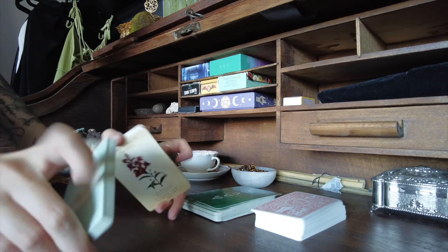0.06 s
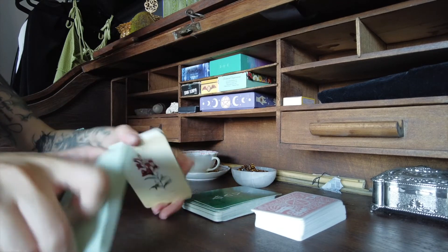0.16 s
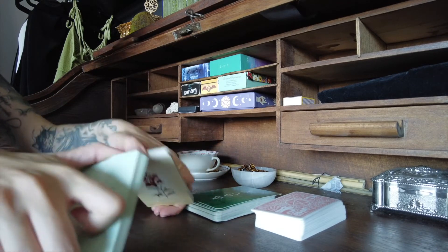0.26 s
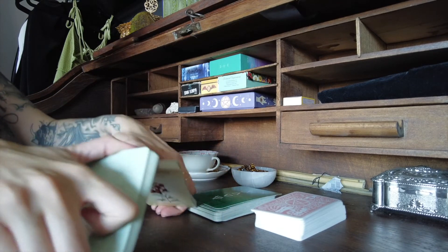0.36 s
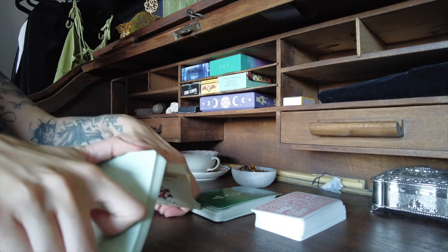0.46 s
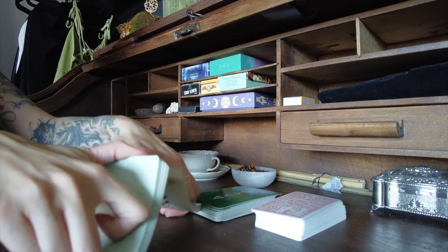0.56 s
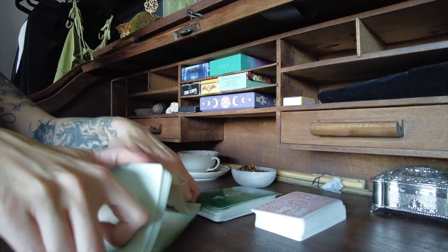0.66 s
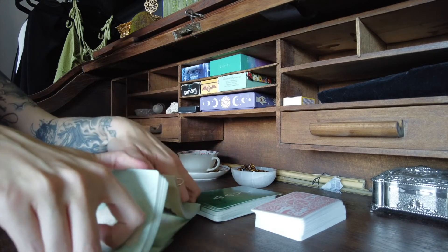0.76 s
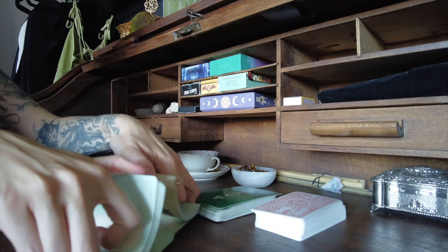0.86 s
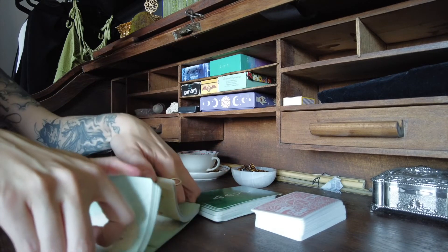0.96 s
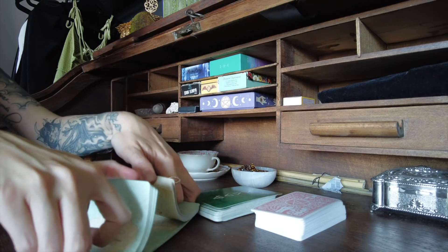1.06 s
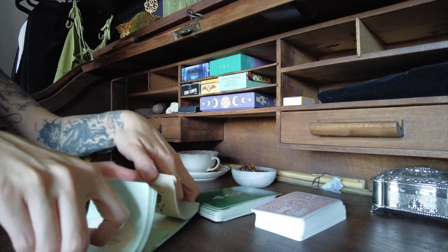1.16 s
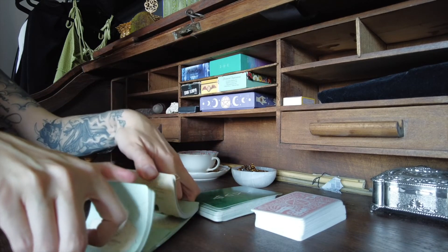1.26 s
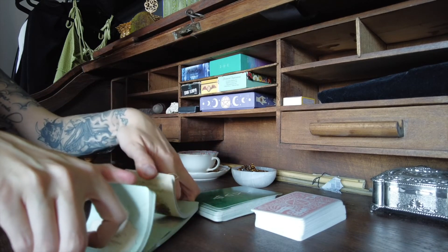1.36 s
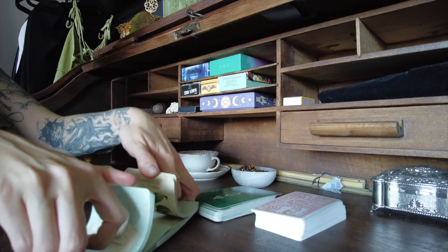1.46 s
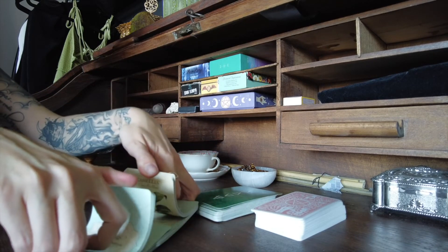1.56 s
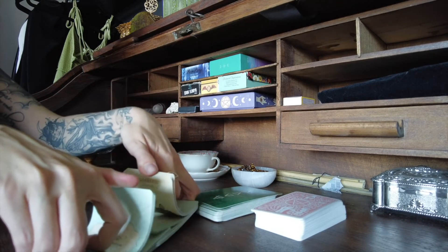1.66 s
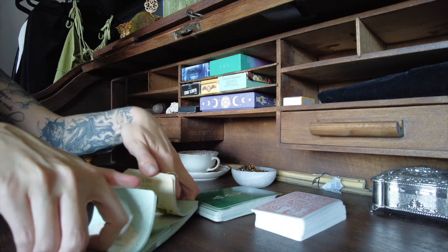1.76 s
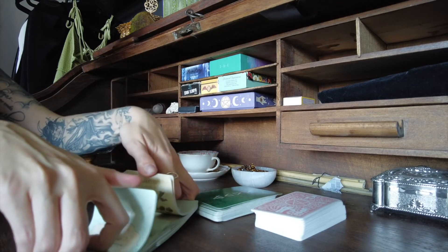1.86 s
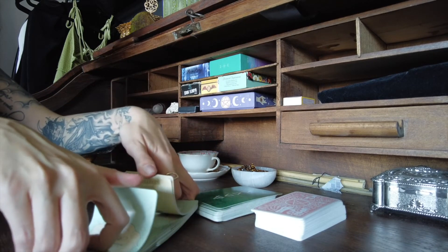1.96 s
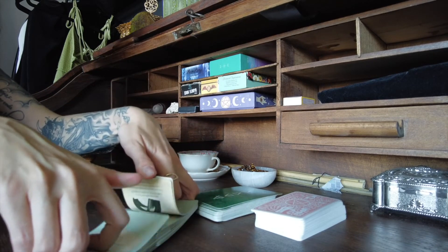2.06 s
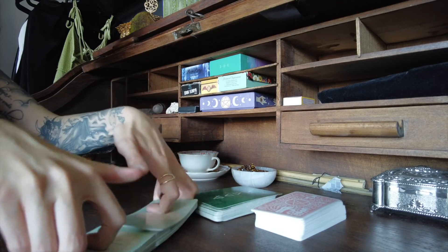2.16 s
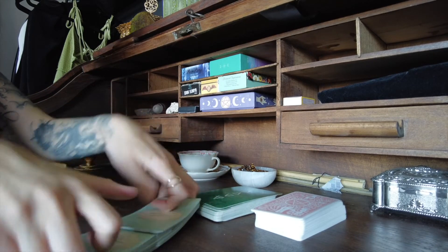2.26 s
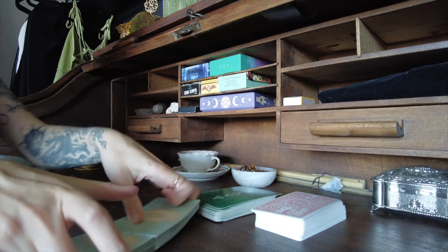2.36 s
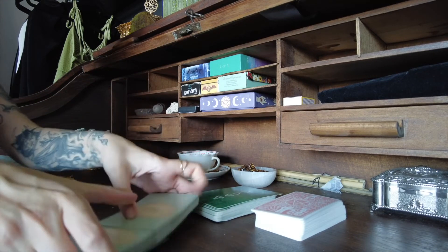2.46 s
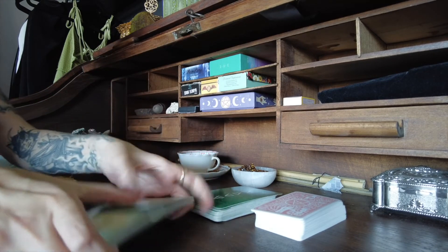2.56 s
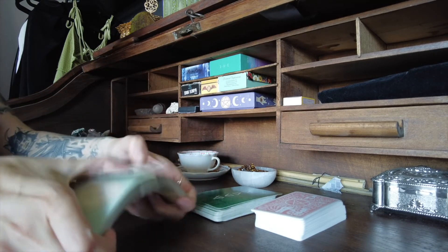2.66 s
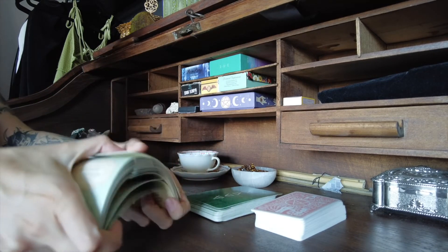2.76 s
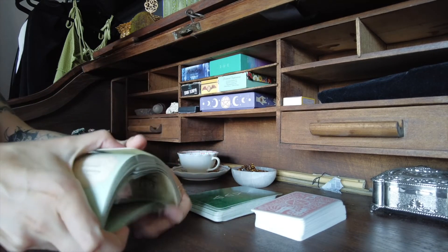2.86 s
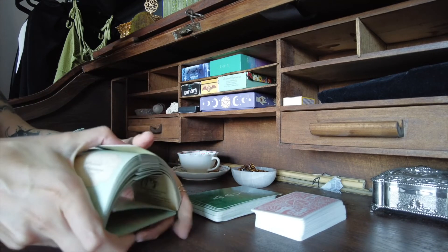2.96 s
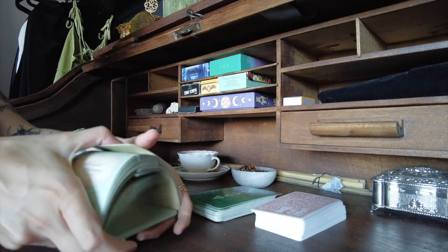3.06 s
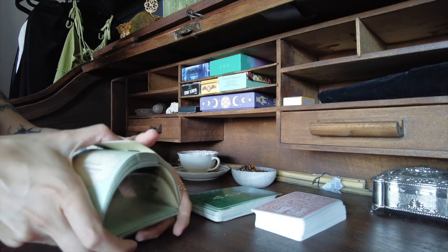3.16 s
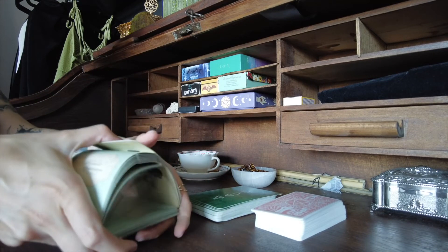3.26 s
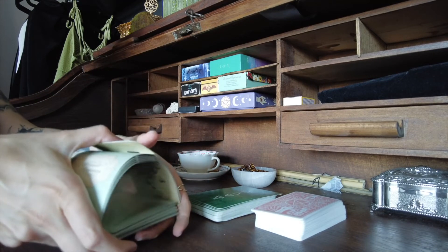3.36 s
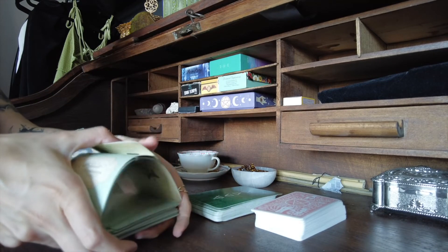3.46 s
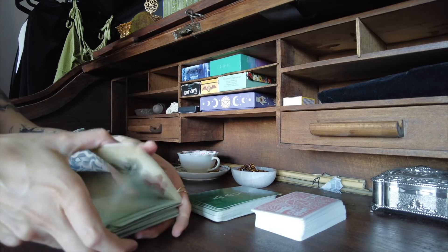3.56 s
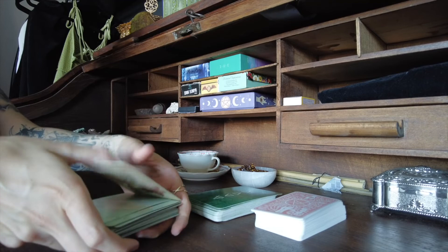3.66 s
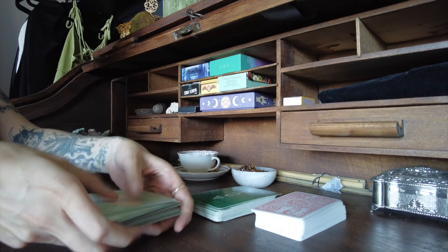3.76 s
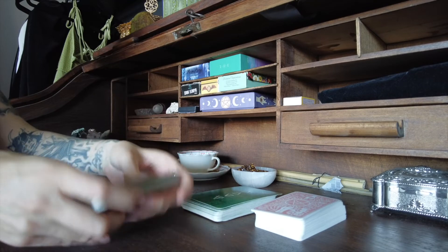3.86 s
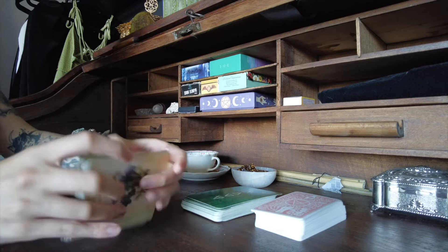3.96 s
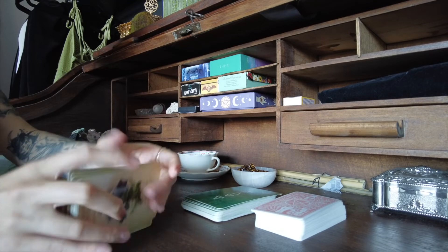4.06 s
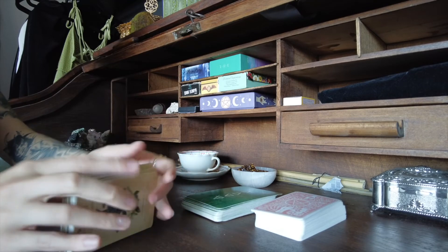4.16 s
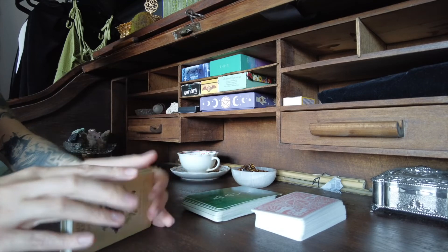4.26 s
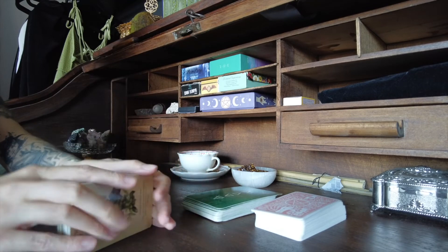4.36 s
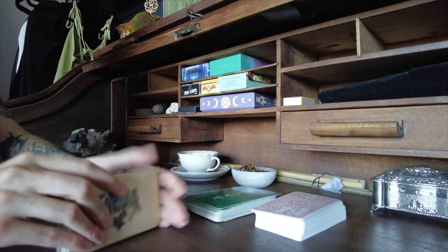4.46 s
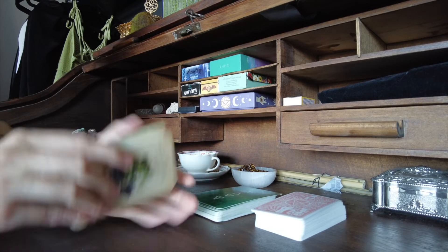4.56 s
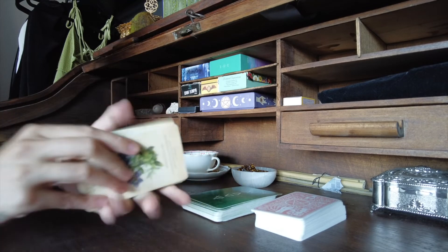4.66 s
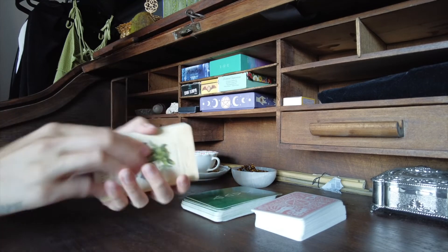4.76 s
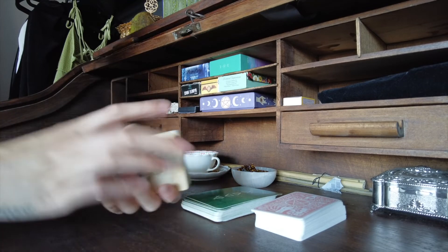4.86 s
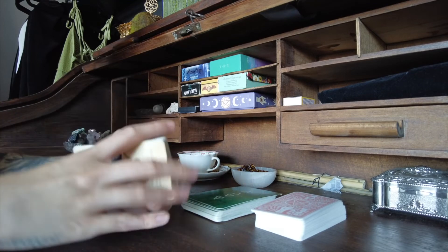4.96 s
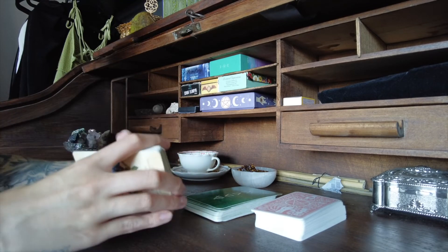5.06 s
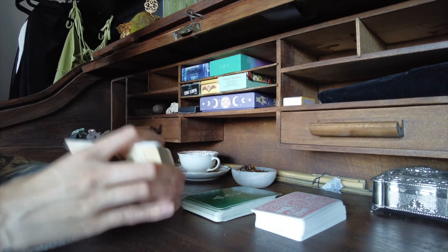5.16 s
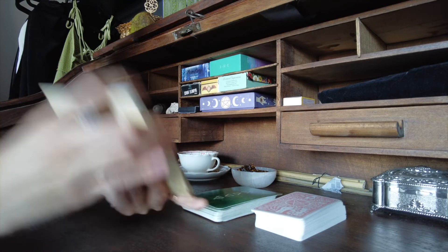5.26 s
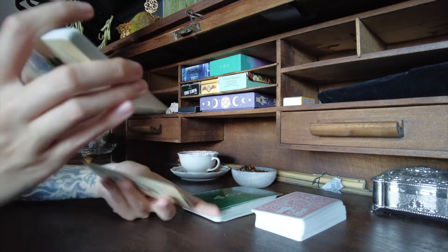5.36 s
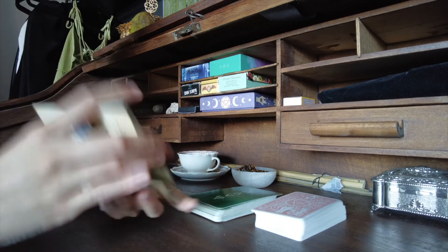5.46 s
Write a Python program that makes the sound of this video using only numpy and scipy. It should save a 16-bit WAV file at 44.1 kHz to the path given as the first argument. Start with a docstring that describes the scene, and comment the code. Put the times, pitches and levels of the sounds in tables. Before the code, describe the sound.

Two spaced microphones sit close to hands working a deck of cards on a wooden desk, in a dry room with only a very short woody reflection. From 0 to 0.6 s there are faint snaps and soft hand rubbing. At about 0.65 s a clear snap starts the riffle: irregular crisp clicks from 0.8 s, crowding together around 1.2-1.45 s, and turning brighter and scratchier until about 2.13 s, with dull low desk thumps beneath. From 2.2 to 3.0 s it quietens to papery slides and soft knocks. Between 3.05 and 3.6 s the arched deck cascades shut in a rapid swishing flutter of snaps. From 3.8 to 4.45 s the deck is squared with muted, hollow, blocky taps and brief scrapes. Sparse rubs follow, then a snap with a firm desk thump near 5.3 s and small clicks at 5.5 s. A low rumble follows the hands over faint steady noise.

```python
"""At a wooden desk with shelves, two spaced microphones stand close to hands working a deck of cards.
First come a few faint snaps, then the riffle: card edges crack, ring and slap while the desk thumps low.
The cards rub and slide in the hands, the arched deck cascades shut, and it is squared up on the desk top.
Snaps and rubs are shaped noise; the card hollow, desk and drawer are resonators; the shelves answer
with a short noise tail. A low rumble follows the hands, over steady background noise."""
import sys
import numpy as np
from scipy import signal
from scipy.fft import rfft, irfft, next_fast_len
from scipy.io import wavfile
from scipy.ndimage import uniform_filter1d, map_coordinates

SR = 44100
rng = np.random.default_rng(int(sys.argv[2]) if len(sys.argv) > 2 else 0)


def gain_from_db(level_db):
    """Turn a decibel level (scalar or array-like) into a linear amplitude factor."""
    decades = np.asarray(level_db, float) / 20
    return 10 ** decades


def dump(signal):
    """Clip the signal to [-1, 1] and save it as 16-bit WAV at the path in sys.argv[1]."""
    limited = np.clip(np.atleast_2d(signal).T, -1, 1)
    pcm = np.round(limited * 32767).astype(np.int16)
    wavfile.write(sys.argv[1], SR, pcm)


N = 243431  # samples

# Levels in all tables are relative: later gains set how loud each layer sits.
# card edges slipping and slapping: start_s, peak_db, push_db and treble_db (over the peak), ring_hz
CARD_SNAPS = [(.079, -44, 0.5, -28.5, 1865), (0.1711, -39.5, 0, -22, 1630), (0.625, -29.5, -11, -13, 3140),
              (0.6564, -6.5, -11.5, -9.5, 1423), (.7321, -21, -16.5, -18.5, 2140),
              (0.7864, -32, -35, -15.5, 1540), (.834, -4.5, -15.5, -11, 1392),
              (0.8579, -15.5, -5, -13.5, 2190), (0.8922, -20.5, -10, -17, 2070),
              (0.9123, -10, -23.5, -19, 1770), (.926, -7, -4.5, -17.5, 2100), (0.9478, -4, -8, -19.5, 1600),
              (0.957, -6, -10, -24.5, 1550), (1.0116, -27.5, -6, -12, 1830),
              (1.0224, -2.5, -11.5, -15.5, 1697), (1.066, -26.5, -4.5, -7, 1670),
              (1.078, -6, -3.5, -18.5, 1310), (1.0966, -11, -14.5, -18, 1700),
              (1.1363, -22, -9.5, -7.5, 1540), (1.1627, 0.5, -12.5, -20, 2300),
              (1.2043, -24, -2.5, -8.5, 1810), (1.213, -7, -9.5, -21.5, 1717),
              (1.2378, -5, -18.5, -11.5, 1814), (1.2583, -2, -6.5, -18, 1590),
              (1.3047, -6.5, -16.5, -14, 1726), (1.3183, -20, 1, -23, 1730),
              (1.3575, 4.5, -12.5, -21, 1610), (1.3989, -4.5, -19.5, -7, 1610),
              (1.4087, 0, -8, -15.5, 1505), (1.4269, 3.5, -18.5, -8.5, 1500), (1.4442, -1, -9, -17, 1490),
              (1.5285, -26, -15, -7.5, 1325), (1.539, -9, -4.5, -26.5, 1440),
              (1.6145, -22, -15.5, -8.5, 1790), (1.6215, -4, -8.5, -3.5, 1437),
              (1.6903, -2.5, -12, -17, 1855), (1.722, -2.5, -23, -8, 3300), (1.766, -1, -21, -6.5, 3120),
              (1.8437, -4, -8.5, -12, 1737), (1.8788, -2.5, -33, -9, 3250),
              (1.9016, -8.5, -9.5, -21.5, 3820), (1.914, 1, -16, -13, 1454),
              (1.972, -16.5, -15.5, -4, 3200), (1.9794, -5, -7.5, -8.5, 3220),
              (2.0095, 3, -19.5, -14, 1677), (2.0298, 1, -19.5, -15, 3390), (2.0495, 5, -29, -13.5, 3070),
              (2.1157, -0.5, -12, -5.5, 3160), (2.1251, -4.5, -4, -9.5, 2520),
              (2.473, -35.5, -15, -22, 1380), (2.701, -32.5, 0.5, -25, 1520), (3.098, -19, -3, -29, 1255),
              (3.1332, -12.5, -15.5, -6, 1680), (3.153, -10.5, -9.5, -17, 1614),
              (3.1954, -11.5, -14.5, -15, 1840), (3.207, -14, -19.5, -11, 1690),
              (3.29, -8.5, -18.5, -16, 1676), (3.3012, -10, -10.5, -16.5, 1855),
              (3.306, -15, -16, -14, 2500), (3.3186, -5.5, -26.5, -18, 1900),
              (3.3408, 2.5, -15.5, -9, 1690), (3.349, -16.5, -23, -21.5, 1580),
              (3.3641, -24.5, -19.5, -19.5, 1650), (3.387, 2, -22, -13.5, 3160),
              (3.4241, 1, -19, -26, 1396), (3.462, 1.5, -27.5, -14.5, 1425),
              (3.498, -0.5, -25, -18.5, 1545), (3.5343, -4.5, -36, -25, 1470), (3.576, -19, -2, -24, 1290),
              (3.9646, -34, -14.5, -11.5, 1490), (3.995, -15.5, -15, -41, 1405),
              (4.006, -19, -12, -36, 1290), (4.0244, -22.5, -5, -43.5, 1680),
              (4.049, -6.5, -21, -27.5, 2010), (4.057, -9.5, -19, -35.5, 1767),
              (4.123, -13.5, -19, -44, 1670), (4.1882, -10.5, -20, -41.5, 1500),
              (4.3199, -27, -12.5, -40.5, 1660), (4.4071, -20.5, -14, -15.5, 1430),
              (4.415, -23.5, -7.5, -23.5, 1695), (4.429, -29.5, -5.5, -20, 3140),
              (4.695, -29.5, -31, -15.5, 1296), (5.0553, -18.5, -24, -18.5, 1560),
              (5.28, -41.5, 6, -9.5, 1270), (5.3151, -14, 1, -11, 1556), (5.469, -35.5, -8, -9.5, 1600),
              (5.502, -21, -38, -34, 1563), (5.5144, -24.5, -8.5, -21.5, 1740)]
# noise colours of a snap's bright crack, its slap and its push of air and wood: freq_hz, density_db
CRACK_COLOUR = [(1500, -28.5), (3500, -1.5), (6000, 1.5), (10000, -3.5), (16000, -7.5), (20000, -8)]
SLAP_COLOUR = [(300, -11.5), (700, -7), (1400, 3), (2500, -2), (4000, -7), (7000, -22), (20000, -58)]
PUSH_COLOUR = [(80, -1.5), (200, -1.5), (500, -5.5), (900, -8.5), (2000, -24), (20000, -84.5)]
# a puff of air, one broad and dead resonance: centre_hz, width_hz, level_db
AIR_PUFF = [(207, 1100, -5)]
# steady rubbing while the deck is held: time_s, card_on_card_db, hands_on_wood_db
GRIP_RUB = [(0, -67.5, -50), (.45, -67.5, -47.5), (.6, -69.5, -59), (.91, -43.5, -34), (1.05, -56, -44.5),
            (1.15, -42.5, -33), (1.28, -46.5, -56), (1.44, -42, -30), (1.58, -56, -45), (1.68, -37.5, -31),
            (1.8, -33.5, -35), (1.97, -37, -40.5), (2.08, -26.5, -35), (2.17, -40.5, -40), (2.28, -56, -36),
            (2.38, -60, -46.5), (3.0, -50.5, -50.5), (3.66, -58, -54), (3.94, -72.5, -80.5),
            (4.1, -63.5, -42.5), (4.52, -72, -56), (4.85, -64.5, -59.5), (5.1, -67, -47),
            (5.22, -56.5, -64), (5.44, -64, -52.5)]
# single slides: start_s, hold_s, card_faces_db, deck_edge_db, hands_on_wood_db
SINGLE_SLIDES = [(2.231, 0.0044, -43, -45, -38), (2.287, 0.024, -57.5, -48.5, -32.5),
                 (2.464, 0.031, -50, -43, -51), (2.696, .04, -39, -53, -37),
                 (2.747, .022, -34.5, -42.5, -35), (2.836, 0.033, -29.5, -40.5, -43),
                 (2.988, .01, -46, -44, -36.5), (3.06, 0.093, -27.5, -43.5, -38),
                 (3.124, 0.16, -25.5, -31.5, -42.5), (3.305, 0.11, -26, -34.5, -35.5),
                 (3.405, 0.16, -24.5, -30.5, -35), (3.693, 0.027, -59, -53, -53.5),
                 (3.903, 0.017, -54, -59.5, -78), (3.993, 0.036, -62, -39, -54),
                 (4.059, 0.0074, -57, -28.5, -30.5), (4.194, 0.0041, -58, -33.5, -31.5),
                 (4.29, 0.055, -64.5, -50.5, -37.5), (4.41, 0.0081, -47.5, -37, -31),
                 (4.669, .07, -57, -63, -61), (5.28, .02, -44, -58, -44.5),
                 (5.319, 0.0025, -39, -36.5, -45), (5.515, .01, -42.5, -37.5, -47)]
# how fast a slide swells and fades, for faces, edge, wood: rate_db_per_s
SWELL_RATES = [701.5, 899.5, 603]
FADE_RATES = [379.5, 271.5, 219.5]
# noise colours of rubbed card faces, the brighter hiss of slides, and hands on wood: freq_hz, density_db
FACE_COLOUR = [(1200, -10.5), (3000, 2.5), (4200, 3), (7000, 3), (12000, -2.5), (16000, -6), (20000, -16.5)]
SHEEN_COLOUR = [(5000, -30), (9000, 2), (13000, -1), (16000, -5.5), (20000, -11)]
WOOD_COLOUR = [(60, -21), (116, 2), (150, 0.5), (200, -0.5), (320, -0.5), (500, -11), (900, -14.5),
               (20000, -88.5)]
# deck shape from riffle over arch to squared block: time_s, block_db, low_arch_db, high_arch_db
DECK_SHAPE = [(1.5, -33, -18, -28.5), (1.7, -6, -23, 4.5), (2.1, -2, -29.5, 0), (2.4, -18, -17, -24),
              (3.1, -4.5, 1, -19.5), (3.58, -1, 2, -4), (3.72, 3, -11, -9.5), (3.9, 22.5, -2.5, -7.5),
              (4.5, 1.5, -20, -11), (5.3, 2, -14.5, -11)]
# resonances of the squared block and of the arched hollow: centre_hz, width_hz, level_db
BLOCK_MODES = [(640, 270, -6), (785, 59, 3), (930, 26, -6)]
LOW_ARCH_MODES = [(1630, 268, 1.5), (2300, 300, -10.5), (930, 52, -1.5)]
HIGH_ARCH_MODES = [(3020, 500, -0.5), (4500, 330, -32), (6050, 240, -6)]
# hands and deck knocking the desk: start_s, peak_db, boom_db and drawer_db (over the peak)
DESK_KNOCKS = [(0.426, -15, -19.5, -31), (0.645, -24, -16, 2), (0.827, -33, 6, -19), (0.857, -16, 0, -22),
               (0.932, -26, -17, -15), (0.947, -1.5, -14, -27), (1.02, -10, -5.5, -18.5),
               (1.058, -15, -13, -21), (1.154, -12, -21.5, -20), (1.211, 7.5, -15, -20.5),
               (1.26, -27, -14, -14), (1.311, -3, -19.5, -10), (1.358, -30, -4.5, -8.5),
               (1.414, -24, -14, -14.5), (1.441, -13, -2.5, -14), (1.521, -14, -8, -24.5),
               (1.608, -16.5, -32, -20), (1.69, 2, -13, -13), (1.758, -35, -19, -10),
               (1.828, -24, -16.5, -20), (1.909, -3, -6, -12.5), (1.977, -19.5, -20, -21),
               (2.051, 5, -10, -13), (2.107, 1.5, -37, -11), (2.122, -2.5, -19, -10), (2.147, 1, -19, -9),
               (2.328, -13.5, -0.5, -3), (2.579, -11.5, -11.5, -12), (2.7, -23, -1, -20),
               (2.766, -11.5, -3, -15), (2.883, -15.5, 1.5, -3), (3.103, -30, -8.5, -13.5),
               (3.318, -12.5, -8, -0.5), (3.458, -19, -18, -17), (3.581, -20, -32, -0.5),
               (3.797, -16, -13, -15), (3.998, -17, -9, -6), (4.05, -14, -26.5, -16), (4.18, -33, -21, -26),
               (4.405, -21, -21, -21), (5.094, -17.5, -13, -9), (5.316, -24, -4, -14),
               (5.338, 1.5, -7.5, -9)]
# desk top, whole desk rocking, and a hollow drawer that hums on: centre_hz, width_hz, level_db
DESK_TOP_MODES = [(210, 5.7, -1), (248.5, 19, 0.5), (360, 38, 2), (410, 35, -3)]
DESK_ROCK_MODES = [(50, 10, 1.5), (84, 72, 5.5)]
DRAWER_MODES = [(116, 9, 0)]
# decay of the shelves' answer: freq_hz, t60_s
SHELF_DECAY = [(200, 0.15), (2000, 0.22), (10000, 0.18)]
# noise colours of the desk's rumble and of the steady background: freq_hz, density_db
RUMBLE_COLOUR = [(15, -13.5), (30, -11.5), (50, -3.5), (90, -8), (150, -24.5), (20000, -120)]
HUSH_COLOUR = [(15, -26), (25, 16), (123, -17.5), (190, -13.5), (285, -12.5), (560, -18.5), (775, -37),
               (962, -25.5), (1040, -38.5), (1440, -30.5), (2550, -33), (14800, -48), (16000, -56.5)]
# where the paths to the microphones cancel: freq_hz, gain_db
PATH_CANCEL = [(700, -0.5), (1020, -6), (1300, -1), (2000, 0), (2350, -1.5), (2900, -1.5)]
# stereo width: freq_hz, side_minus_mid_db
STEREO_WIDTH = [(60, -16), (92, -24), (140, -11.5), (210, -14.5), (330, -10.5), (500, -8), (770, 0),
                (1170, -0.5), (1790, -13), (2740, 1.5), (4190, 0), (6410, -0.5), (9810, -0.5), (15000, 2)]
# stereo balance: freq_hz, left_minus_right_db
STEREO_LEAN = [(60, -1.5), (180, -1.5), (550, 0), (1650, -0.5), (4970, -0.5), (15000, 0)]


def snaps():
    """A slipping edge cracks bright and short; the card rings at its own pitch, slaps down and shoves air and wood."""
    start_s, peak_db, push_db, treble_db, ring_hz = np.transpose(CARD_SNAPS)
    # each part scales this decay; harder snaps are damped sooner
    t60_s = 0.029 * 2 ** (-0.0371 * peak_db)
    crack = bursts(start_s, peak_db + treble_db + 6, 0.57 * t60_s, rise_s=0.00025) * noise(CRACK_COLOUR)
    slap = bursts(start_s, peak_db - 11, 1.006 * t60_s, rise_s=0.00037) * noise(SLAP_COLOUR)
    ring = bursts(start_s, peak_db - 11.5, 1.06 * t60_s, rise_s=0.0006, ring_hz=ring_hz)
    ring = ring * [[1], [0.7]]
    push = bursts(start_s, peak_db + push_db + 3.5, 0.85 * t60_s, rise_s=0.0013)
    # squeezed air always pushes outward first, so the puff keeps its sign
    puff = gain_from_db(3.5) * ringing(push, AIR_PUFF) * [[1], [0]]
    rattle = lumps(1200, depth_db=3.5) * crack
    rattle = rattle + lumps(800, depth_db=1.5) * (slap + ring)
    return rattle + push * noise(PUSH_COLOUR) + puff


def bursts(start_s, level_db, t60_s, rise_s, ring_hz=None):
    """A faint swell rises and falls around each blow, which climbs and dies away; given ring_hz, a ringing tone."""
    lead = SR // 50
    out = np.zeros(N + SR)
    t = (np.arange(SR // 4) - lead) / SR
    after = np.maximum(t, 0)
    swell = gain_from_db(-26 - 60 * np.abs(t) / 0.059)
    for k, (s, db, life_s) in enumerate(zip(start_s, level_db, t60_s)):
        decay = gain_from_db(-60 * after / max(life_s, 0.004))
        blow = decay * (1 - np.exp(-after / rise_s)) + swell
        tone = 1 if ring_hz is None else np.sin(2 * np.pi * ring_hz[k] * after)
        out[round(s * SR):][:len(t)] += gain_from_db(db) * blow * tone
    return out[lead:][:N]


def slides():
    """Friction comes in tiny catches, so each rub is grainy; smooth faces catch least."""
    card_db, hand_db = curves(GRIP_RUB)
    edge_db = -40.5 + 0.9 * (card_db + 42)
    steady = gain_from_db([card_db, edge_db, hand_db])
    sliding = strokes()
    face, edge, wood = np.maximum(steady, sliding)
    wood = wood * lumps(30, depth_db=3) * noise(WOOD_COLOUR)
    catches = lumps(400, depth_db=1.0)
    edge = edge * ticks(90, spread_db=2.0, t60_s=0.017) * noise(SLAP_COLOUR)
    face = face * lumps(50, depth_db=2.0) * noise(FACE_COLOUR)
    sheen = gain_from_db(-4.5) * sliding[0] * noise(SHEEN_COLOUR)
    return wood + catches * (edge + face + sheen)


def strokes():
    """Gain of faces, edge and wood: each slide swells, holds and fades."""
    t = np.arange(N) / SR
    gain = np.zeros((3, N))
    for start_s, hold_s, *level_db in SINGLE_SLIDES:
        before_db = np.outer(SWELL_RATES, np.maximum(start_s - t, 0))
        after_db = np.outer(FADE_RATES, np.maximum(t - start_s - abs(hold_s), 0))
        gain = np.maximum(gain, gain_from_db(np.c_[level_db] - (before_db + after_db)))
    return gain


def ticks(rate_hz, spread_db, t60_s):
    """A gain of rms 1 that jumps at random moments, as single card edges catch and let go."""
    jolts = (rng.random(N) < rate_hz / SR) * gain_from_db(spread_db * rng.exponential(size=N))
    decay = gain_from_db(-60 * np.arange(SR // 20) / SR / t60_s)
    gain = 0.6 + signal.fftconvolve(jolts, decay)[:N]
    return gain / np.sqrt(np.mean(gain ** 2))


def pocket(cards):
    """The hollow under arched cards rings high; the squared deck knocks lower, like a block."""
    hollows = zip(curves(DECK_SHAPE), (BLOCK_MODES, LOW_ARCH_MODES, HIGH_ARCH_MODES))
    return cards + sum(ringing(gain_from_db(db) * cards, modes) for db, modes in hollows)


def knocks():
    """Soft blows: a smooth push of a few ms into the desk's modes, nearly alike at both microphones."""
    start_s, peak_db, boom_db, drawer_db = np.transpose(DESK_KNOCKS)
    # added dB: how strongly each narrow resonator answers a blow
    answer_db = peak_db + [0 * start_s + 32.5, boom_db + 36.5, drawer_db + 52]
    blows = np.zeros((3, N))
    blows[:, np.round(start_s * SR).astype(int)] = gain_from_db(answer_db)
    t = np.arange(SR // 50) / SR
    soft = t * np.exp(-t / 0.00069)
    blows = signal.fftconvolve(blows, soft[None] / soft.sum(), axes=1)[:, :N]
    parts = zip(blows, (DESK_TOP_MODES, DESK_ROCK_MODES, DRAWER_MODES))
    desk = sum(ringing(blow, modes) for blow, modes in parts)
    return desk * gain_from_db([[0], [-16]])  # mid, side


def shelves(cards):
    """The wooden cubbies answer at once; each frequency dies at its own speed."""
    hz, t, z = signal.stft(rng.standard_normal((2, SR // 3)), SR, nperseg=256)
    decay = gain_from_db(-60 * t / along(SHELF_DECAY, hz)[:, None])
    tail = signal.istft(z * decay, SR, nperseg=256)[1]
    return signal.fftconvolve(cards, tail / np.linalg.norm(tail[0]), axes=1)[:, :N]


def desk_rumble():
    """The desk rumbles as the hands work on it, following their rub sluggishly above a constant floor."""
    hand_db = curves(GRIP_RUB)[1]
    work_db = uniform_filter1d(hand_db, int(0.25 * SR))  # 0.25 s average
    gain = gain_from_db(-51) + gain_from_db(-42 + 0.96 * (work_db + 45))
    return gain * lumps(14, depth_db=4) * noise(RUMBLE_COLOUR)


def hush():
    """Steady background noise, heaviest in the deep bass."""
    return gain_from_db(-48.5) * noise(HUSH_COLOUR)


def spaced(mid, other):
    """Side signal of spaced microphones: partly the mid arriving earlier on the left, partly unrelated."""
    lead_s = 24 / SR  # the hands are nearer the left microphone

    def share(hz):
        return 0.68 * np.sin(2 * np.pi * hz * lead_s) * np.exp(-hz / 4000)

    def width(hz):
        return gain_from_db(along(STEREO_WIDTH, hz))

    early = filtered(mid, lambda hz: 1j * share(hz) * width(hz))
    unrelated = filtered(other, lambda hz: np.sqrt(np.abs(1 - share(hz) ** 2)) * width(hz))
    return early + unrelated


def along(points, hz):
    """(freq_hz, value) points read on a log axis."""
    f, v = np.transpose(points)
    return np.interp(np.log(hz + 1), np.log(f + 1), v)


def curves(rows):
    """One value per sample for each column after the time."""
    time_s, *columns = np.transpose(rows)
    return [np.interp(np.arange(N) / SR, time_s, c) for c in columns]


def filtered(x, response):
    """x times a complex response of frequency."""
    m = next_fast_len(N + SR // 2)
    return irfft(rfft(x, m) * response(np.fft.rfftfreq(m, 1 / SR)), m)[..., :N]


def ringing(x, modes):
    """x through causal resonances, added with alternating sign."""
    def response(f):
        total = 0
        for k, (centre, width, db) in enumerate(modes):
            damping = 1j * f * width
            total = total + (-1) ** k * gain_from_db(db) * damping / (centre * centre - f * f + damping)
        return total

    return filtered(x, response)


def noise(colour):
    """Two unrelated coloured noises of rms 1."""
    x = filtered(rng.standard_normal((2, N)), lambda hz: gain_from_db(along(colour, hz)))
    return x / x.std()


def lumps(rate_hz, depth_db):
    """A smooth random gain of rms 1 with rate_hz random knots a second."""
    knots = rng.standard_normal(int(N * rate_hz / SR) + 4)
    gain = gain_from_db(depth_db * map_coordinates(knots, [np.arange(N) * rate_hz / SR]))
    return gain / np.sqrt(np.mean(gain ** 2))


def scene():
    """Sources are made as mid and side; the microphones agree in the bass and differ in the treble."""
    cards = pocket(snaps() + slides())
    cards = cards + gain_from_db(-8.5) * shelves(cards)
    cards = filtered(cards, lambda hz: gain_from_db(along(PATH_CANCEL, hz)))
    mid, other = cards + desk_rumble() + hush()
    mid, side = np.array([mid, spaced(mid, other)]) + knocks()
    left_right = np.array([mid + side, mid - side])
    return filtered(left_right, lambda hz: gain_from_db([[0.5], [-0.5]] * along(STEREO_LEAN, hz)))


def roll_off(x):
    """The treble ends steeply here."""
    return signal.sosfilt(signal.butter(12, 16370, fs=SR, output="sos"), x)


def record(dry):
    """Peaks beyond full scale clip; a steep low-pass then removes everything from 16.3 kHz up."""
    clipped = np.clip(gain_from_db(-0.96) * dry, -1, 1)
    finished = filtered(clipped, lambda hz: hz < 16300)
    return roll_off(finished)


dry = scene()
out = record(dry)
dump(out)
```